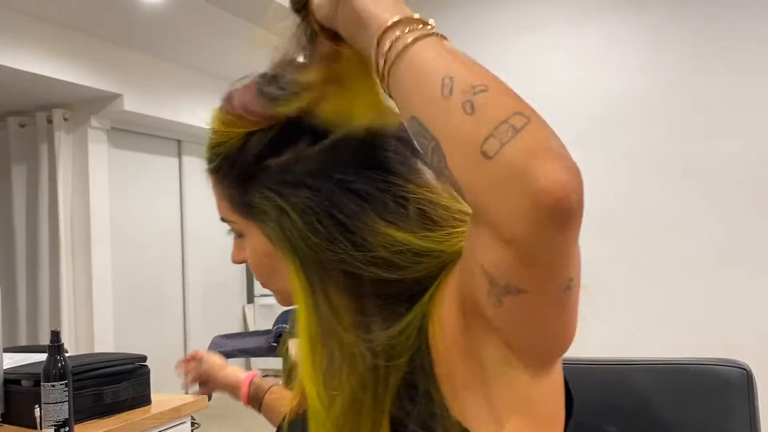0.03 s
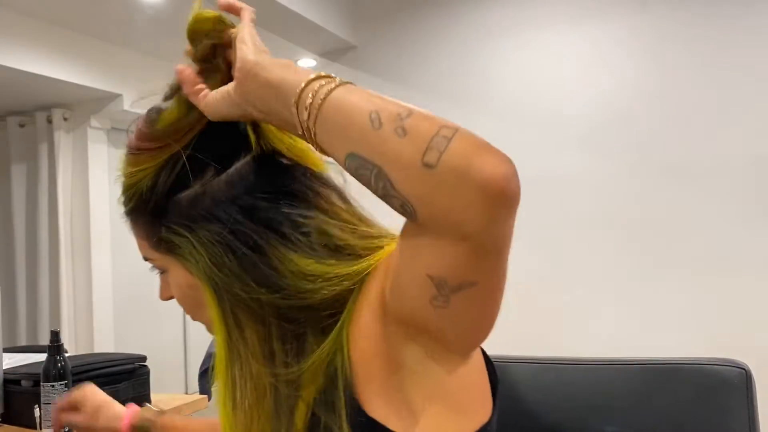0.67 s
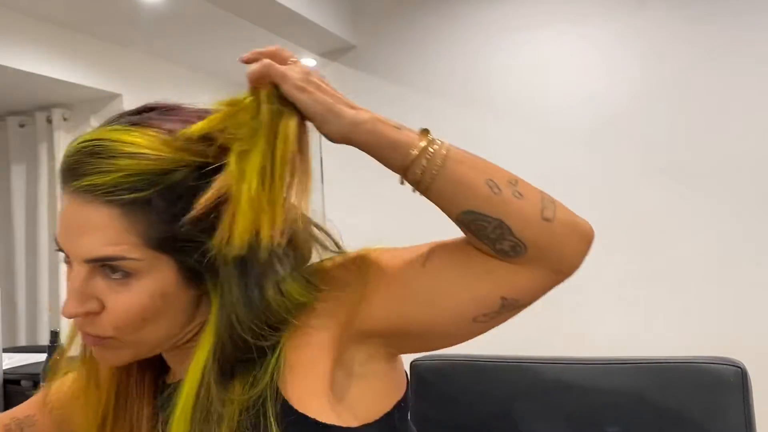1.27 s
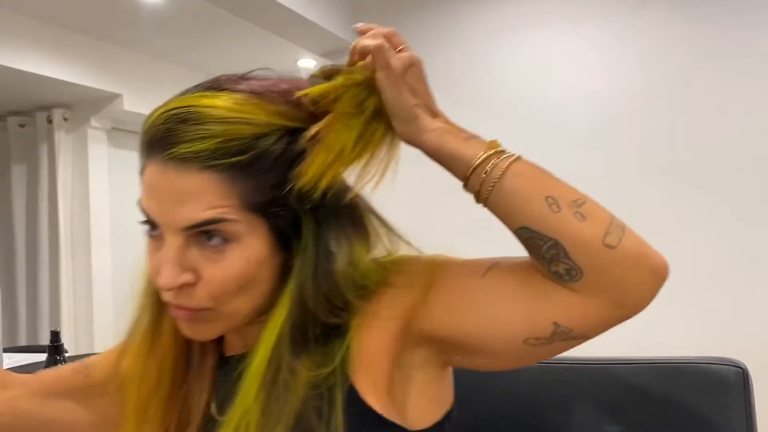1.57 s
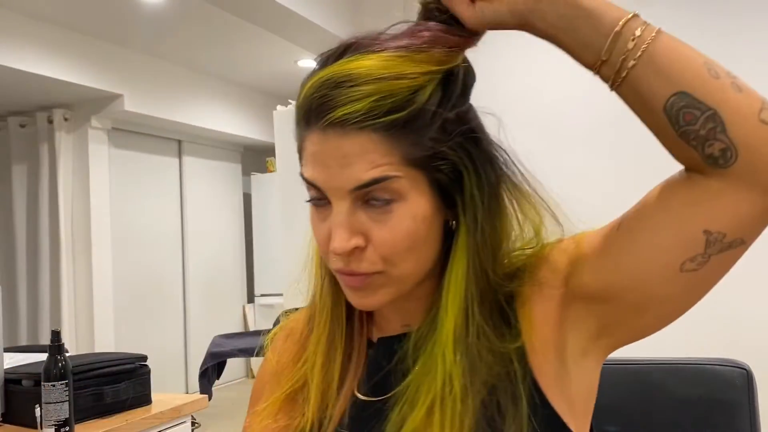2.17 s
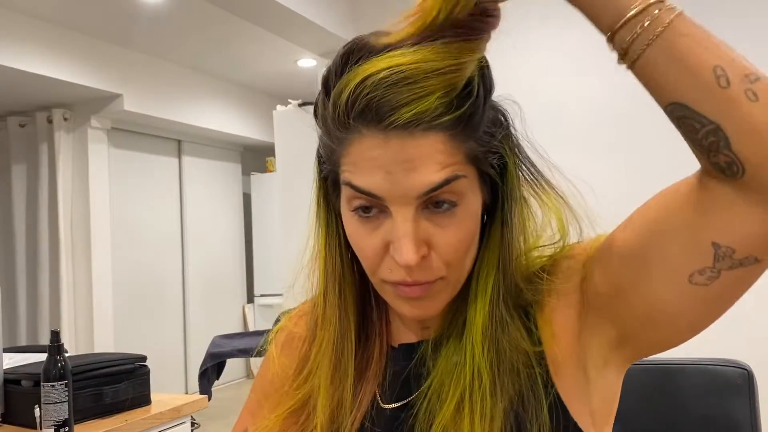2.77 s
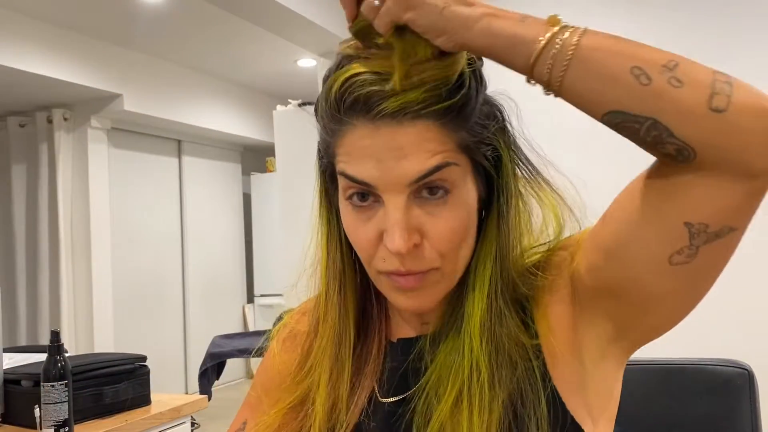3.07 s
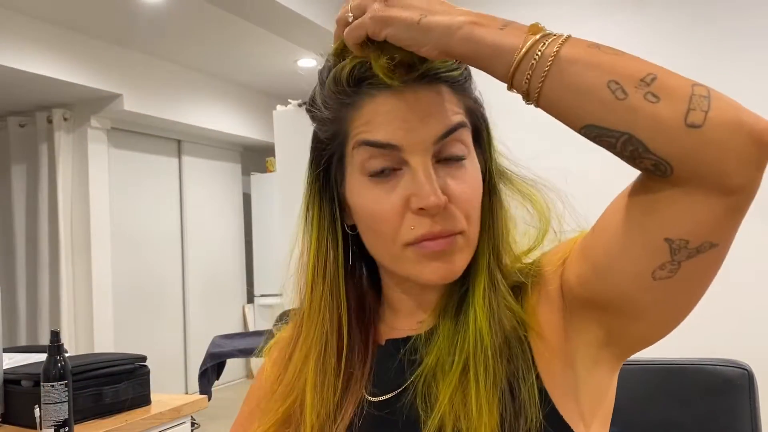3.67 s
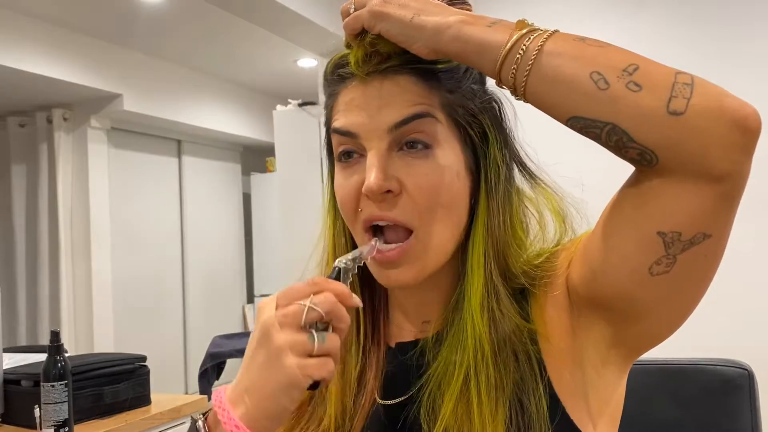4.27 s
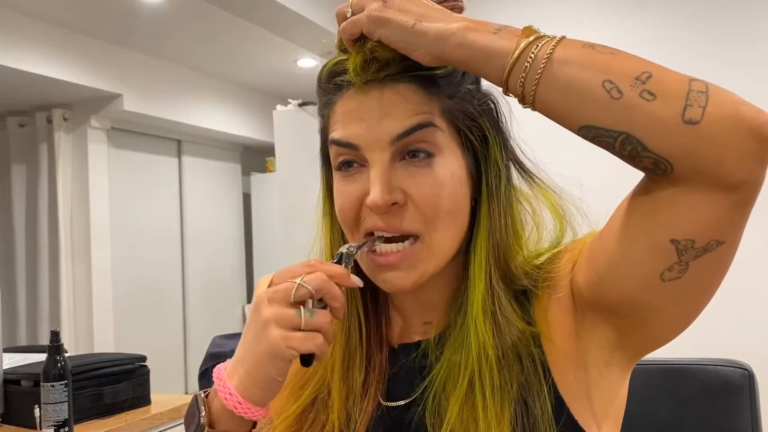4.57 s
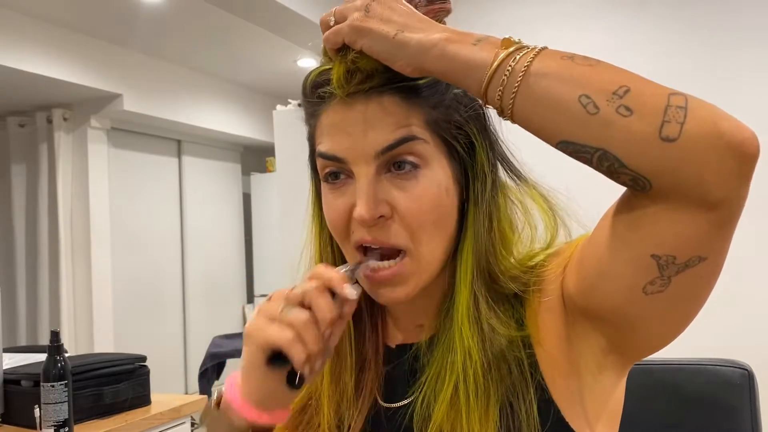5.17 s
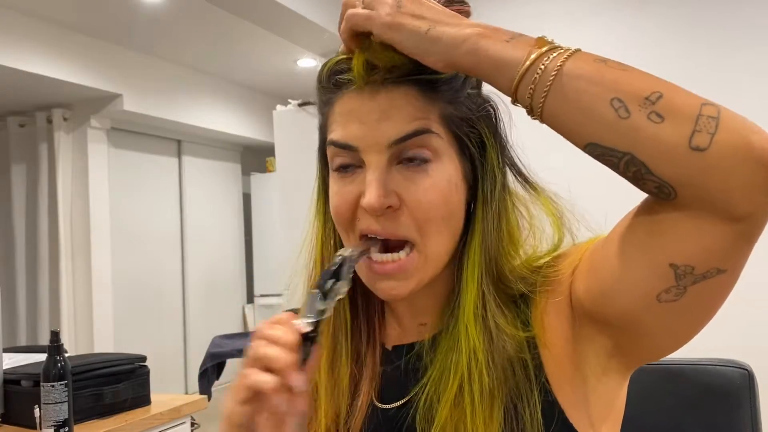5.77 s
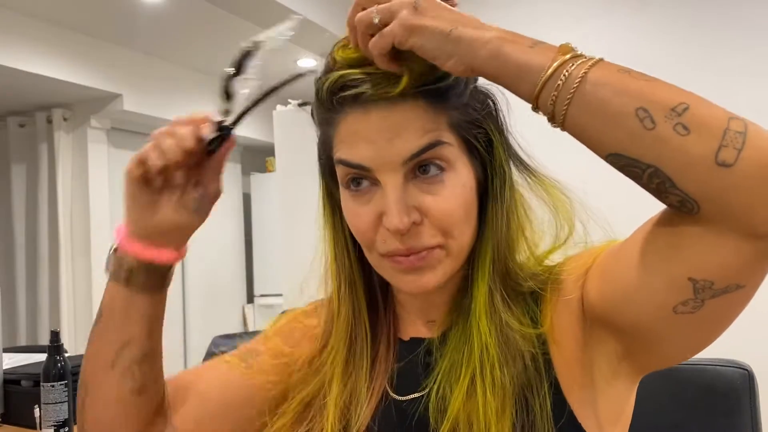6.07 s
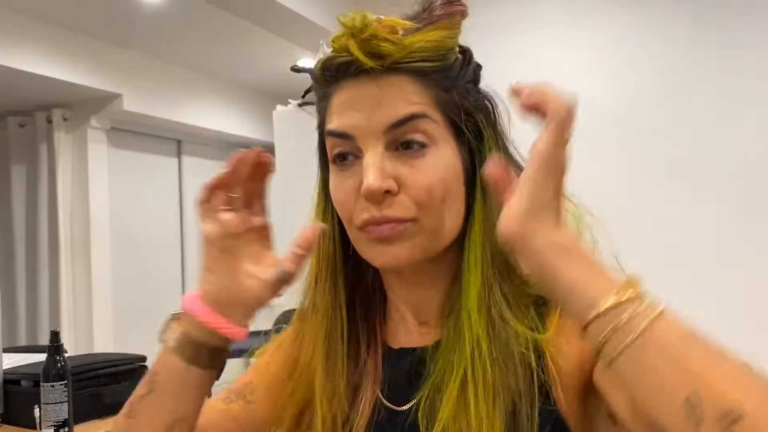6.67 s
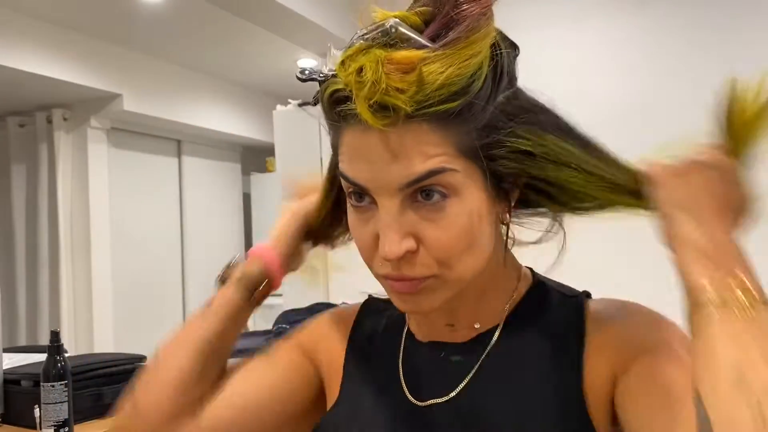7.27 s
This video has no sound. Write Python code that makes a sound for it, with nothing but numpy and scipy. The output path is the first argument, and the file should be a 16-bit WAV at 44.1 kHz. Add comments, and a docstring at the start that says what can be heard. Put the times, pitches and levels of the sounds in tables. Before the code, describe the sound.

Plastic hair clips clatter, click and snap while hair rustles softly and bracelets jingle, over a low hum in a small room.

```python
"""Pinning up hair in a bare room

A small, bare room, a phone's two microphones an arm's length from someone doing their hair. Plastic clips
clatter on a table, tick in the hand, are prised open with the teeth and snap shut, each blow ringing
the plastic. Strands rustle as they slip, bracelets jingle, the lips pop once and the chair creaks.
Behind it all, two motors hum in a slow beat over a little rumble and quiet room noise."""
import sys
import numpy as np
from scipy import signal
from scipy.fft import rfft, irfft, next_fast_len
from scipy.io import wavfile
from scipy.ndimage import uniform_filter1d

SR = 44100
rng = np.random.default_rng(int(sys.argv[2]) if len(sys.argv) > 2 else 0)


def bounce(signal):
    """Save signal as a 16-bit WAV file at the path given by the first command-line argument."""
    frames = np.transpose(np.atleast_2d(signal))
    limited = np.clip(frames, -1, 1)
    pcm = np.round(limited * 32767).astype(np.int16)
    wavfile.write(sys.argv[1], SR, pcm)


N = 327222
TIME = np.arange(N) / SR

# Levels in the tables are relative: each source's gain and the room come on top.
# a clip cracking down on the table, then clicking in the hand: start_s, level_db, ring_hz, body_db
CLIP_BLOWS = [(1.329, -31, 3000, 21.5), (2.1699, -33, 8600, -4), (2.713, -54.5, 4140, 31),
              (3.1478, -24, 7300, 2.5), (3.416, -41, 7500, 10), (3.4384, -34.5, 6530, 7.5),
              (3.5976, -47.5, 7060, 9), (3.668, -46, 7000, 9.5), (3.7917, -42.5, 5800, 6.5),
              (3.828, -38, 6750, 11), (3.9982, -34, 5570, 2), (4.072, -37.5, 7500, 0),
              (4.1493, -51, 3350, -10), (4.2913, -60.5, 11800, -13), (4.8976, -49.5, 4400, 6),
              (5.4732, -29, 7740, -2), (5.503, -41.5, 6640, 15), (5.5653, -30.5, 7350, 2),
              (5.8188, -52.5, 3920, 9), (5.852, -41.5, 4100, 3.5), (5.8744, -24, 9900, 6)]
JAW_MODES = [(2820, 1200, -8.5), (4240, 1700, 4.5), (5570, 520, 4), (5840, 560, 3), (6830, 370, -1),
             (8700, 340, -3.5), (9260, 1600, 3.5), (15300, 800, 3.5)]
# a clip knocking on teeth: start_s, level_db, sheen_db
TOOTH_KNOCKS = [(4.56, -43, -1), (4.568, -39.5, -5), (4.584, -34, -2.5), (5.2584, -43, -5.5),
                (5.264, -42, -2.5), (5.2893, -39.5, -1.5), (5.3553, -31, -15), (5.365, -38.5, 3),
                (5.3687, -29.5, -9.5), (5.8714, -24.5, 11)]
BITTEN_MODES = [(2580, 140, -2.5), (3520, 330, 1), (5300, 500, 7.5), (6160, 4500, -5.5), (13700, 4000, 1.5)]
MOUTH_HOLLOW = [(4.567, 1450, -7), (4.584, 1320, 5.5), (5.26, 1340, -3.5), (5.369, 1275, 6),
                (5.871, 915, 7)]
# something set on the table, rattling to rest: start_s, level_db
TABLE_KNOCKS = [(1.3298, -24.5), (1.335, -35.5), (1.365, -32.5)]
# the table top's thud: frequency_hz, level_db
THUD_SPECTRUM = [(40, -53), (115, 4), (165, -14), (260, 0.5), (390, -6), (1100, -0.5), (2700, -5),
                 (5000, -18.5), (15000, -63)]
# the table top ringing on: pitch_hz, level_db
TABLE_RINGS = [(200, -41), (253, -43), (517, -37.5), (657, -35), (974, -44), (1373, -50.5)]
# strokes through the hair: middle_s, half_length_s, level_db
HAIR_STROKES = [(0.35, 1, -85.5), (1.28, 0.063, -57.5), (1.95, 0.11, -73), (2.55, 0.17, -67.5),
                (2.83, 0.07, -70), (3.06, 0.071, -68), (3.724, 0.081, -68), (4.801, 0.014, -62.5),
                (4.878, 0.07, -68), (7.42, 0.21, -79)]
# strands sliding on strands: frequency_hz, level_db
STRAND_SPECTRUM = [(1200, -2), (2500, 1.5), (3600, -0.5), (7000, -7), (10500, -10.5), (14000, -14)]
# the palm rubbing over the head: middle_s, half_length_s, level_db
PALM_RUBS = [(0.33, 0.74, -72), (1.12, 0.16, -62.5), (1.288, 0.063, -56.5), (2.0, 0.056, -62.5),
             (2.6, 0.12, -60.5)]
# palm on hair: frequency_hz, level_db
PALM_SPECTRUM = [(200, 21), (600, 15.5), (1200, 13), (2200, 0), (4000, -21)]
# loose ends sweeping through the air: middle_s, half_length_s, level_db
END_SWEEPS = [(0.6, 0.79, -91), (1.27, 0.039, -76), (1.61, 0.052, -66), (1.95, 0.027, -65.5),
              (4.799, 0.013, -52.5), (6.4, 0.18, -78), (7.0, 0.071, -81.5), (7.33, 0.15, -76.5)]
# their swish: frequency_hz, level_db
SWISH_SPECTRUM = [(6000, -25.5), (9000, -8), (14500, -6.5)]
# prongs scraping along hair, the ring set by the grip: middle_s, half_length_s, ring_hz, level_db
PRONG_SCRAPES = [(6.277, 0.3, 3200, -84.5), (6.412, 0.19, 5680, -80.5), (6.525, 0.032, 2970, -67),
                 (6.525, 0.015, 10100, -61.5)]
# bracelets jostling on the wrist: start_s, level_db, ring_hz
JOSTLES = [(1.2417, -45, 9200), (1.566, -43.5, 7550), (2.12, -52.5, 10900), (2.3234, -50, 7560),
           (2.3586, -59, 5000), (2.383, -52, 4830), (2.4895, -46.5, 3250), (3.058, -56.5, 3460),
           (4.787, -48, 7030), (4.859, -49, 5570), (5.218, -62, 4045), (6.468, -57.5, 2930)]
# resonances of their links: pitch_hz, width_hz, level_db
LINK_MODES = [(4453, 4000, -7), (14600, 3400, -2.5)]
# the chair ticking as the body leans: start_s, level_db
CHAIR_TICKS = [(0.104, -67.5), (0.211, -66.5), (0.246, -72), (0.334, -64), (0.366, -69), (0.415, -70),
               (0.628, -66.5), (0.688, -68), (0.939, -66.5)]
# its padded frame: frequency_hz, level_db
FRAME_SPECTRUM = [(200, 4), (520, 15.5), (780, 0), (1480, 11), (2100, -7.5), (2800, -8), (5000, -13.5),
                  (9000, -30)]
# harmonics 1 to 3 of its squeak: level_db
SQUEAK_HARMONICS = [-9, 0, -18]
# slow course of the hum's octave: time_s, level_db
OCTAVE_LEVELS = [(0, -62.5), (1.0, -51.5), (2.7, -47), (4.1, -58), (5.5, -53.5), (7.42, -56)]
# a brief swell of the hum's fourth harmonic: middle_s, half_length_s, level_db
BUZZ_SWELLS = [(5.42, 0.23, -63)]
# two close tones fluttering against each other in the rumble: pitch_hz, level_db
DRONE_TONES = [(58.8, -57.5), (64.4, -60)]
# low rumble: frequency_hz, level_db
RUMBLE_SPECTRUM = [(25, -34), (46, -15), (64, 8), (73, 3), (84, -2.5), (120, -9.5), (150, -26), (250, -66)]
# room noise: frequency_hz, level_db
AIR_SPECTRUM = [(30, -27), (130, 4), (270, -1), (500, -8), (1000, -17), (1600, -28), (3500, -34),
                (11000, -48), (15000, -37.5)]
# the room's reverberation: frequency_hz, t60_s
ROOM_DECAY = [(100, 0.61), (1500, 0.48), (6000, 0.49), (10000, 0.38), (15000, 0.21)]


def clips():
    """A clip cracks down on the table, then clips tick in the hand and snap shut, close on the left."""
    events = []
    for s, db, ring_hz, body_db in CLIP_BLOWS:
        lead_db = 13 - 0.02 * (db + 31.5)  # the favoured ring stands out a little less in a hard click
        events.append((s, db, ring_hz, lead_db, body_db, -2))
    dry = struck_part(events, JAW_MODES, decay_s=0.00077, grit=1.8, crack_db=-9.5, catch_db=-33.5)
    # summed over all directions, the peaks and gaps of the rings even out
    around = struck_part(events, JAW_MODES, decay_s=0.00024, grit=0.9, crack_db=-4.5, catch_db=-13,
                         focus=0.38)
    return undb(-16) * room(dry, wet_db=-6.5, early_db=-6, pan_db=3.5, lag_s=22e-6, around=around)


def teeth(ring_hz=3940, lead_db=2.5, body_db=6.5, hollow_width_hz=69):
    """Teeth grate on a clip and prise it open; the mouth's hollow rings along."""
    dry = np.zeros(N)
    times, hollow_hz, hollow_db = np.transpose(MOUTH_HOLLOW)
    for s, db, sheen_db in TOOTH_KNOCKS:
        hollow = (np.interp(s, times, hollow_hz), hollow_width_hz, np.interp(s, times, hollow_db))
        bite = (s, db, ring_hz, lead_db, body_db, sheen_db)
        dry += struck_part([bite], [hollow, *BITTEN_MODES], decay_s=0.0007, grit=2.2,
                           crack_db=-11, catch_db=-26.5)
    return undb(-17.5) * room(dry, wet_db=-4.5, early_db=-1, pan_db=3, lag_s=20e-6)


def table(t60_s=0.33):
    """A clatter on the table reaches the microphones mostly off the walls; the top rings on."""
    age = np.maximum(TIME - TABLE_KNOCKS[0][0], 0)
    ring = sum(undb(db) * np.sin(2 * np.pi * hz * age) for hz, db in TABLE_RINGS)
    ring *= np.exp(-np.log(1000) * age / t60_s)
    clatter = thuds(TABLE_KNOCKS, THUD_SPECTRUM)
    return undb(-24) * room(clatter, wet_db=13.5, early_db=10, pan_db=1.5) + ring


def hair(fingers_db=-19.5, ends_db=-14.5, crackle_db=-5, crackles_per_s=120):
    """Strands hiss and crackle with each stroke; the hand brushes along and loose ends swish."""
    hiss = swells(HAIR_STROKES)
    brush = swells(PALM_RUBS) + undb(fingers_db) * hiss
    swish = swells(END_SWEEPS) + undb(ends_db) * hiss
    layers = (hiss, STRAND_SPECTRUM), (brush, PALM_SPECTRUM), (swish, SWISH_SPECTRUM)
    dry = sum(level * unit(colour(slips(), spectrum)) for level, spectrum in layers)
    # single strands catch and spring free
    crackles = (rng.random(N) < crackles_per_s / SR) * rng.standard_normal(N)
    dry += undb(crackle_db) * hiss * unit(colour(crackles, STRAND_SPECTRUM))
    return room(dry + prongs(), wet_db=-4, early_db=-1.5, pan_db=2.5)


def prongs():
    """Hair slips past a clip's prongs and rings them."""
    friction = slips()
    track = np.zeros(N)
    for s, half_s, hz, db in PRONG_SCRAPES:
        b, a = signal.iirpeak(hz, Q=1.6, fs=SR)
        ring = signal.lfilter(b, a, signal.lfilter(b, a, friction))
        track += undb(db) * swell(s, half_s) * unit(ring)
    return track


def bracelets(contacts=6, mean_gap_s=0.006, fade_db=4.5, lead_db=7):
    """Each jostle of the links is a quick, fading run of tiny contacts, each with its own ring."""
    events = []
    for s, db, hz in JOSTLES:
        gaps = mean_gap_s * rng.exponential(size=contacts)
        delays = np.cumsum(gaps) - gaps[0]
        rings_hz = hz * 2 ** (rng.standard_normal(contacts) / 3)
        events += [(s + delays[k], db - fade_db * k, rings_hz[k], lead_db, 0, 0) for k in range(contacts)]
    dry = struck_part(events, LINK_MODES, decay_s=0.0003, grit=1, crack_db=-11.5, catch_db=-18,
                      spread=2.7)
    return undb(-16) * room(dry, wet_db=-0.5, early_db=-1, pan_db=3.5)


def lips(start_s=6.057, low_hz=660, high_hz=900, decay_s=0.006):
    """The lips part with a small hollow pop, just right of centre."""
    age = np.maximum(TIME - start_s, 0)
    pop = (np.sin(2 * np.pi * low_hz * age) + np.sin(2 * np.pi * high_hz * age)) * np.exp(-age / decay_s)
    return room(undb(-50) * pop, wet_db=-11, early_db=-7.5, pan_db=-2)


def chair(squeak_s=1, squeak_hz=284, sag_hz_per_s=54):
    """The padded frame ticks under a leaning body and gives one faint, wavering squeak."""
    pushes = np.zeros(N)
    for s, db in CHAIR_TICKS:
        add(pushes, s, undb(db) * contact(decay_s=0.0016, grit=3))
    ticks = signal.fftconvolve(pushes, thuds([(0, 0)], FRAME_SPECTRUM))[:N]
    hz = squeak_hz - sag_hz_per_s * (TIME - squeak_s)
    phase = 2 * np.pi * np.cumsum(hz * (1 + 0.012 * wander(180))) / SR
    tone = unit(sum(undb(db) * np.sin(k * phase) for k, db in enumerate(SQUEAK_HARMONICS, 1)))
    squeak = undb(-61 + 2.6 * wander(65)) * swell(squeak_s, half_s=0.043) * tone
    return room(ticks + squeak, wet_db=5, early_db=4, pan_db=4)


def motors(pitch_hz=49.26, beat_s=2.88, in_step_s=1.23, rise_db_per_s=0.94):
    """Two motors run nearly in step, so their growing hum beats; its octave beats twice as fast."""
    first = 2 * np.pi * np.cumsum(pitch_hz * (1 + 0.0038 * wander(1.623))) / SR
    second = first + 2 * np.pi * (TIME - in_step_s) / beat_s
    fundamental = undb(-55.5 + rise_db_per_s * TIME) * unit(np.sin(first) + 0.5 * np.sin(second))
    octave_db = np.interp(TIME, *np.transpose(OCTAVE_LEVELS)) + 2 * wander(7.6)
    octave = undb(octave_db) * unit(np.sin(2 * first) + 0.36 * np.sin(2 * second))
    buzz = swells(BUZZ_SWELLS) * unit(np.sin(4 * first))
    return fundamental + octave + buzz


def rumble(throb_db=9, throb_s=1.11, crest_s=1):
    """Low noise throbs about once a second around two close, beating tones."""
    drone = sum(undb(db) * unit(np.sin(2 * np.pi * hz * TIME + 0.51 * wander(0.77)))
                for hz, db in DRONE_TONES)
    throb = np.cos(2 * np.pi * (TIME - crest_s) / throb_s)
    noise = unit(colour(rng.standard_normal(N), RUMBLE_SPECTRUM))
    return drone + undb(-58 + throb_db * throb) * noise


def air():
    """Quiet room noise: alike at both microphones in the bass, wide in the treble."""
    mid, side = (unit(colour(rng.standard_normal(N), AIR_SPECTRUM)) for _ in range(2))
    side = colour(side, [(150, -10), (700, -2)])
    return undb(-64 + 1.36 * wander(20)) * np.array([mid + side, mid - side])


def room(x, wet_db, early_db, pan_db, lag_s=0, around=None, early_s=0.011, size=32768):
    """Direct sound at two microphones, a quick scatter off table and body, then the walls' tail."""
    t = np.arange(size) / SR
    hz = np.fft.rfftfreq(size, 1 / SR)
    centres, t60s = np.transpose(ROOM_DECAY)
    noise = rfft(rng.standard_normal((2, size)))
    shared = 1 / (1 + (hz / 450) ** 2)  # close microphones hear the same bass
    noise = np.sqrt(shared) * rfft(rng.standard_normal(size)) + np.sqrt(1 - shared) * noise
    tail = sum(irfft(noise * at_hz(np.c_[centres, band], hz)) * np.exp(-np.log(1000) * t / t60)
               for band, t60 in zip(np.eye(len(t60s)), t60s))
    early = irfft(noise[::-1])[:, ::-1] * np.exp(-t / early_s)
    response = undb(wet_db) * unit(tail * (t > .006)) + undb(early_db) * unit(early * (t > .001))
    radiated = x if around is None else around  # the walls get what the source sends all around
    reflections = signal.fftconvolve(radiated[None], response / np.sqrt(size), axes=1)[:, :N]
    delayed = np.convolve(x, np.sinc(np.arange(-8, 9) - lag_s * SR), "same")
    return pan(np.array([x, delayed]) + reflections, pan_db)


def struck_part(events, modes, decay_s, grit, crack_db, catch_db, focus=1, spread=1.4, size=4096):
    """Blows ring a small part; the spot struck favours one ring and sets body and sheen."""
    hz = np.fft.rfftfreq(size, 1 / SR)
    track = np.zeros(N)
    for s, level_db, ring_hz, lead_db, body_db, sheen_db in events:
        jf = 1j * hz * (1 + 0.012 * rng.standard_normal())  # the grip shifts the rings each time
        rings = sum((-1) ** k * undb(db) * jf * width / (pitch ** 2 + jf ** 2 + jf * width)
                    for k, (pitch, width, db) in enumerate(modes))
        click = irfft(rfft(contact(decay_s, grit)) * (undb(crack_db) + rings))
        favoured = [(ring_hz / spread, 0), (ring_hz, focus * lead_db), (ring_hz * spread, 0)]
        balance = [(250, body_db - 18.5), (1500, body_db), (4500, 0.0077), (9000, 0), (12000, sheen_db)]
        click = undb(level_db) * unit(colour(colour(click, favoured), balance))
        add(track, s, click)
        add(track, s - 0.003, undb(catch_db) * click)  # the surfaces catch just before they snap
    return track


def contact(decay_s, grit, size=4096):
    """One sharp push, then a short grinding of the surfaces that builds and dies."""
    age = np.arange(size) / SR / decay_s
    push = grit * rng.standard_normal(size) * age * np.exp(-age) / np.sqrt(decay_s * SR / 4)
    push[0] += 1
    return push / np.hypot(1, grit)


def thuds(events, spectrum):
    """Blows on a large, well damped body."""
    thud = unit(colour(signal.unit_impulse(4096), spectrum))
    track = np.zeros(N)
    for s, db in events:
        add(track, s, undb(db) * thud)
    return track


def slips(grain_db=3, flutter_db=1.2):
    """Friction: countless tiny slips of uneven size, in soft flurries."""
    size_db = np.minimum(grain_db * rng.exponential(size=N) + flutter_db * wander(60), 15)
    return (rng.random(N) < .12) * rng.standard_normal(N) * undb(size_db)


def swell(s, half_s):
    """A bell-shaped rise and fall around a time."""
    return np.exp(-np.minimum(((TIME - s) / half_s) ** 2, 20))


def swells(rows):
    """Summed gain of several swells."""
    return sum(undb(db) * swell(s, half_s) for s, half_s, db in rows)


def wander(rate_hz):
    """Smooth random drift with rms 1."""
    step = int(SR / rate_hz)
    held = np.repeat(rng.standard_normal(N // step + 1), step)
    return unit(uniform_filter1d(held, step)[:N])


def colour(x, points):
    """Causal filter through (frequency_hz, level_db) points, built from its cepstrum."""
    n = x.shape[-1]
    size = 2 * next_fast_len(n // 2 + 1024)
    cepstrum = irfft(np.log(undb(at_hz(points, np.fft.rfftfreq(size, 1 / SR)))))
    cepstrum[1:size // 2] *= 2
    cepstrum[size // 2 + 1:] = 0
    return irfft(rfft(x, size) * np.exp(rfft(cepstrum)))[..., :n]


def at_hz(points, hz):
    """Interpolate (frequency_hz, value) points on a log-frequency axis."""
    frequencies, values = np.transpose(points)
    return np.interp(np.log(hz + 1), np.log(frequencies), values)


def add(track, s, sound):
    """Mix a sound in at a time."""
    i = int(s * SR)
    track[..., i:i + sound.shape[-1]] += sound[..., :N - i]


def pan(x, db):
    """Make the left side louder than the right by db."""
    return x * undb(np.array([[db], [-db]]) / 2)


def undb(db):
    """Decibels to gain."""
    return 10 ** (np.asarray(db) / 20)


def unit(x):
    """Scale to rms 1."""
    return x / np.sqrt(np.mean(x ** 2))


def scene():
    """All sources at the phone's two microphones."""
    nearby = clips() + teeth() + bracelets() + lips() + table() + chair() + hair()
    return nearby + pan(motors() + rumble(), db=-1) + air()


def record(dry, shared_above_hz=7300, lag_s=0.000287, top_hz=15850):
    """The phone feeds the right microphone's treble to both sides, late on the left, and cuts the top."""
    hz = np.fft.rfftfreq(N, 1 / SR)
    left, right = rfft(dry)
    own = 1 / (1 + (hz / shared_above_hz) ** 20)
    left = np.sqrt(own) * left + np.sqrt(1 - own) * right * np.exp(-2j * np.pi * hz * lag_s)
    lowpass = signal.ellip(8, .2, 70, top_hz, fs=SR, output="sos")
    return signal.sosfilt(lowpass, irfft(np.array([left, right]), N))


dry = scene()
out = record(dry)
bounce(out)
```